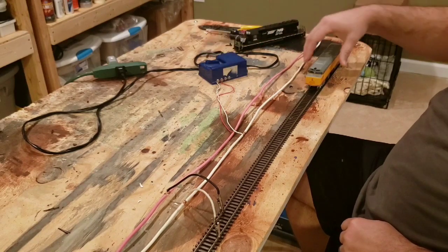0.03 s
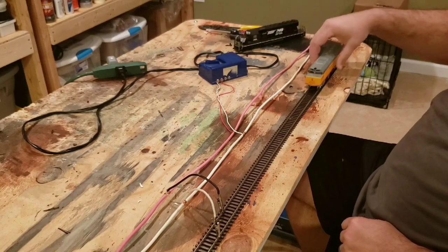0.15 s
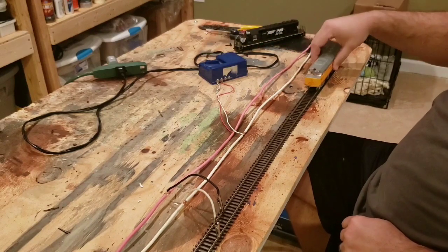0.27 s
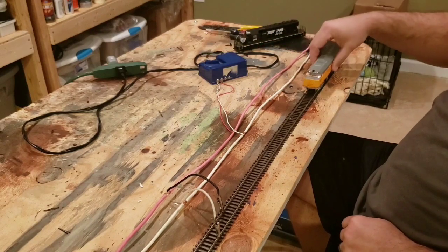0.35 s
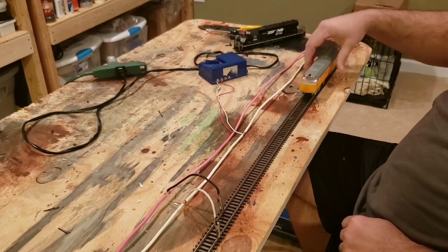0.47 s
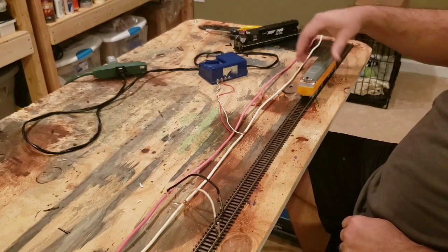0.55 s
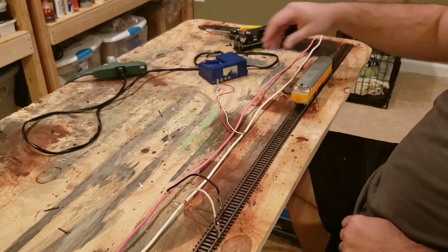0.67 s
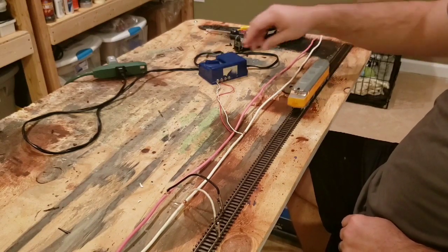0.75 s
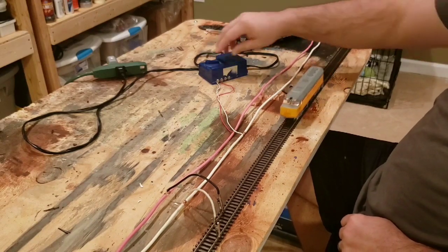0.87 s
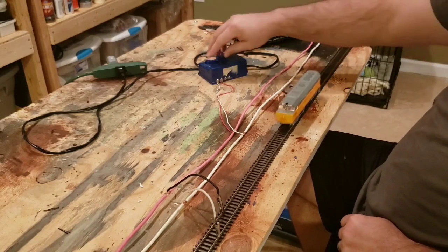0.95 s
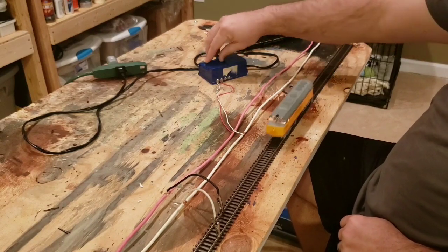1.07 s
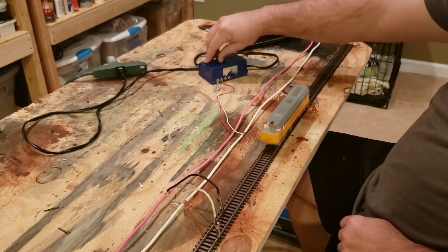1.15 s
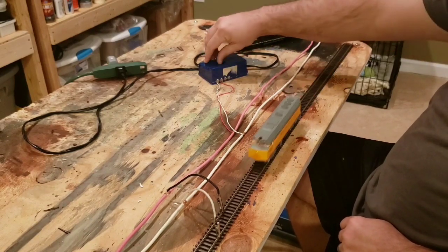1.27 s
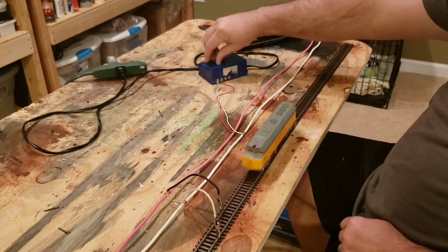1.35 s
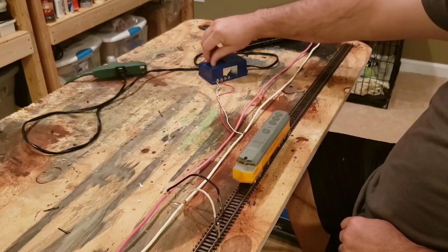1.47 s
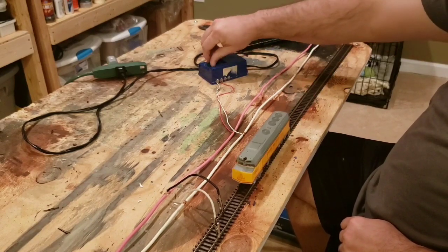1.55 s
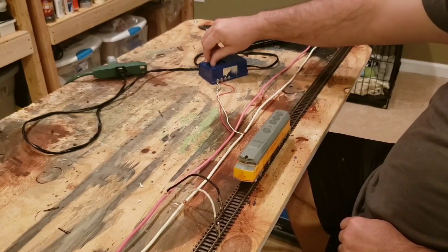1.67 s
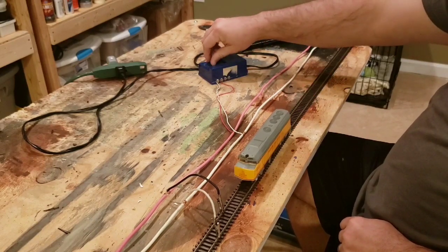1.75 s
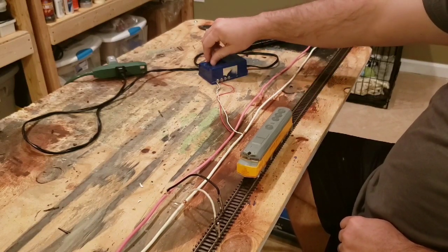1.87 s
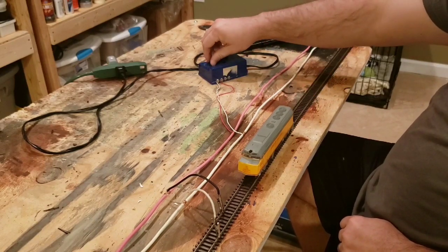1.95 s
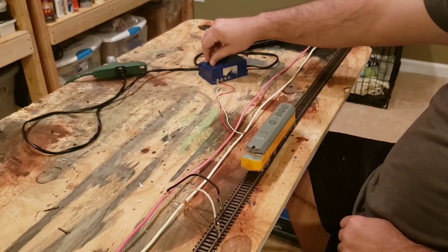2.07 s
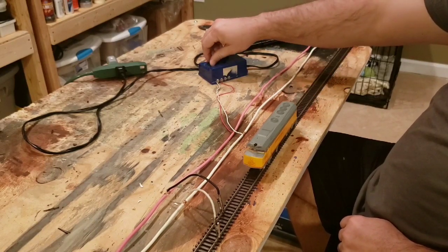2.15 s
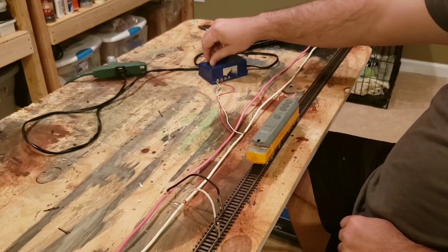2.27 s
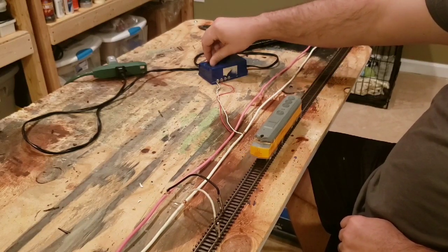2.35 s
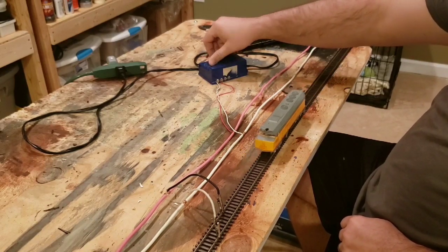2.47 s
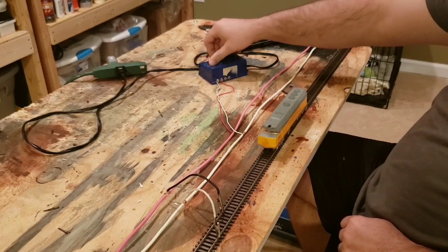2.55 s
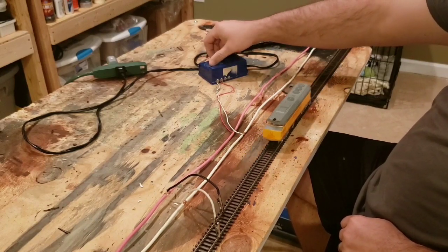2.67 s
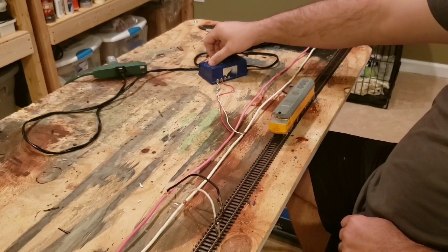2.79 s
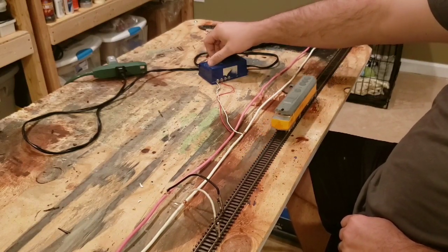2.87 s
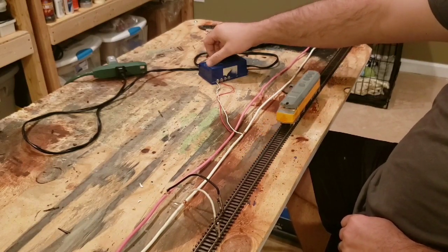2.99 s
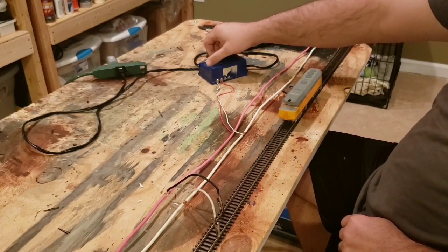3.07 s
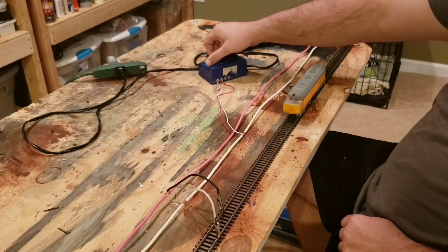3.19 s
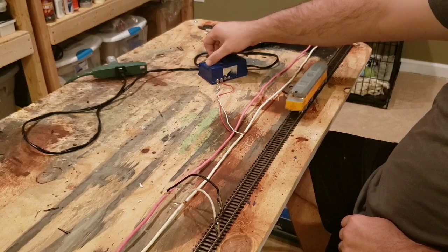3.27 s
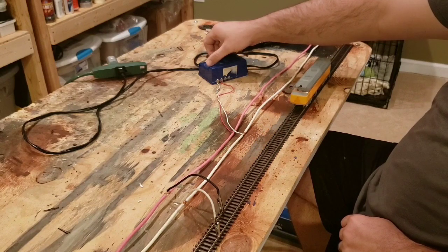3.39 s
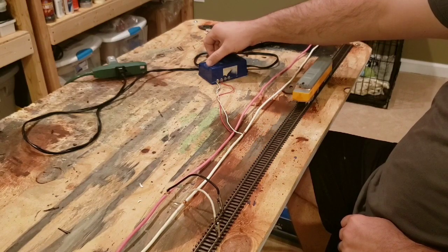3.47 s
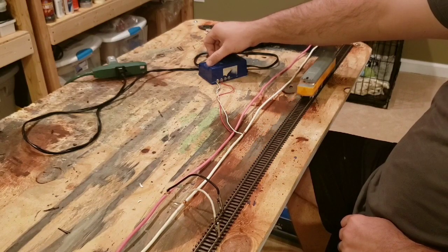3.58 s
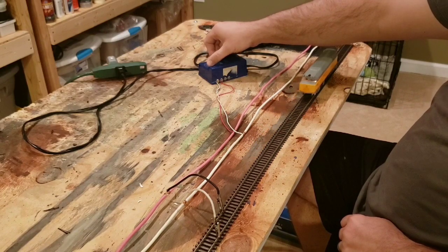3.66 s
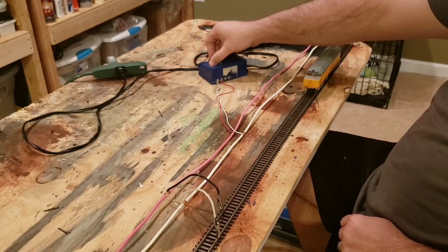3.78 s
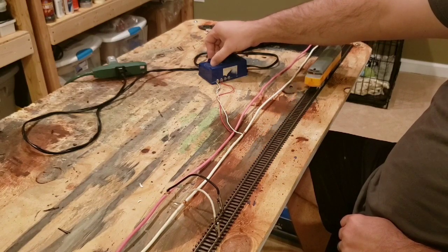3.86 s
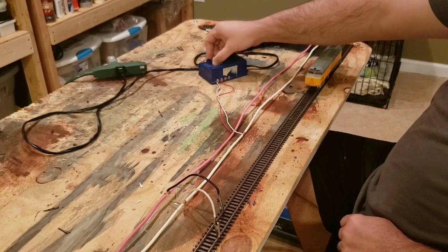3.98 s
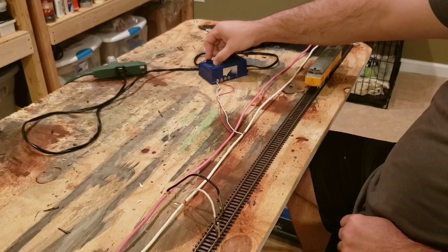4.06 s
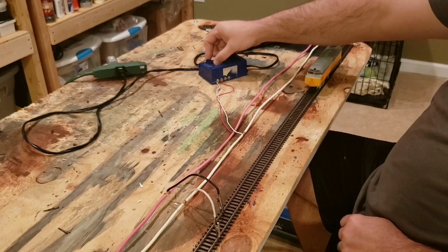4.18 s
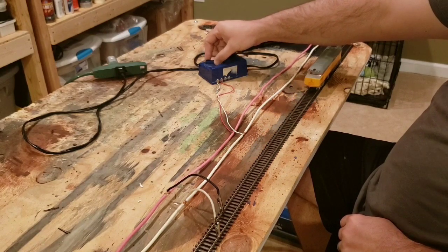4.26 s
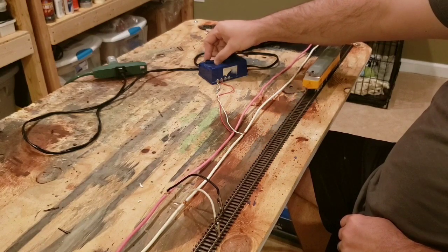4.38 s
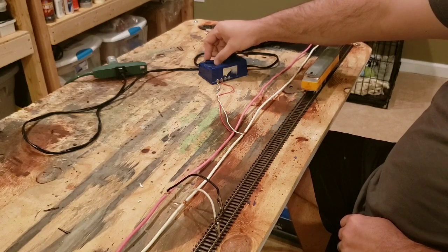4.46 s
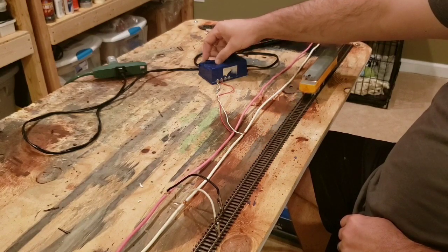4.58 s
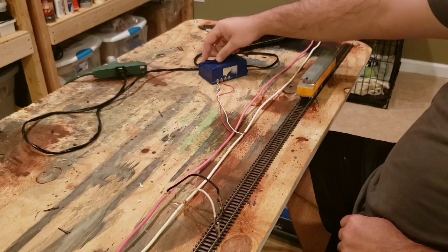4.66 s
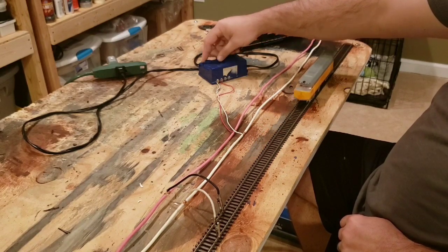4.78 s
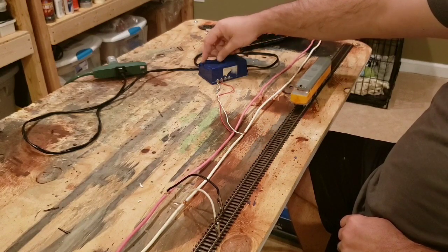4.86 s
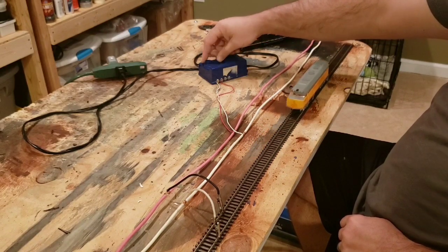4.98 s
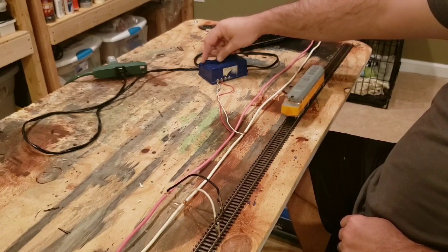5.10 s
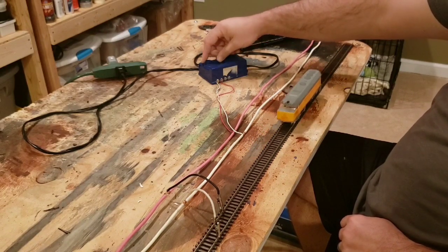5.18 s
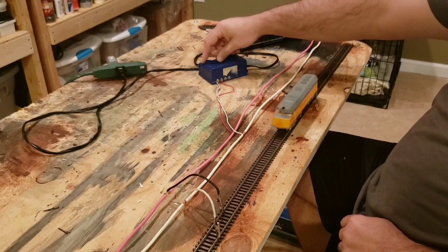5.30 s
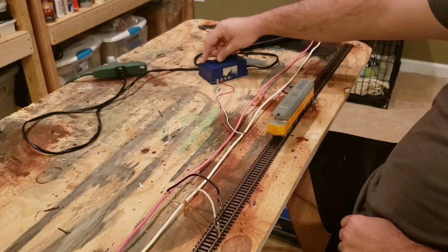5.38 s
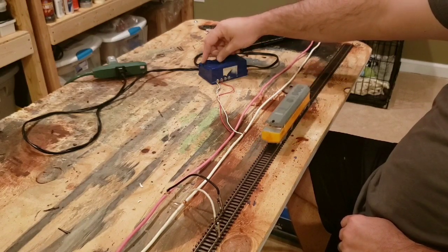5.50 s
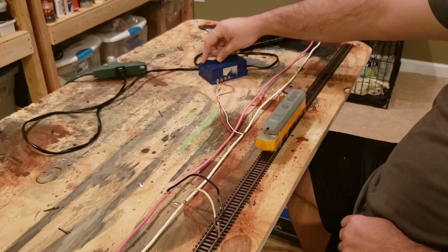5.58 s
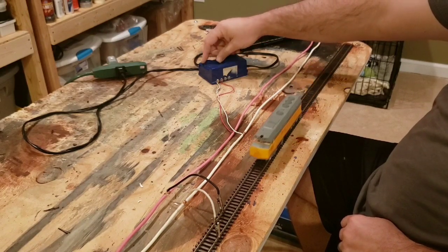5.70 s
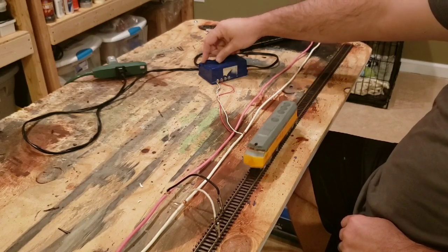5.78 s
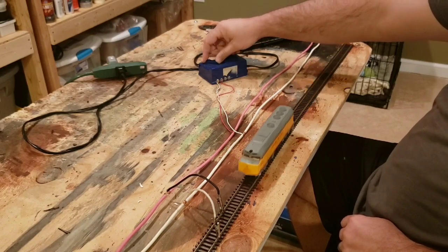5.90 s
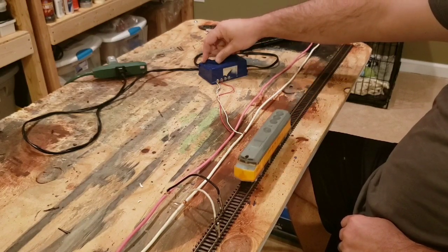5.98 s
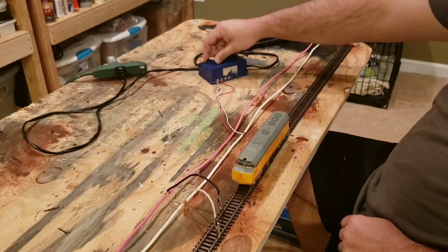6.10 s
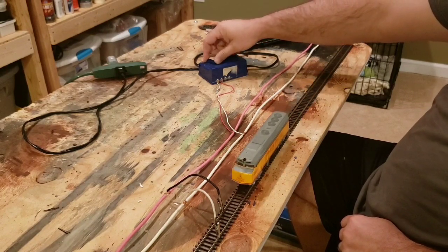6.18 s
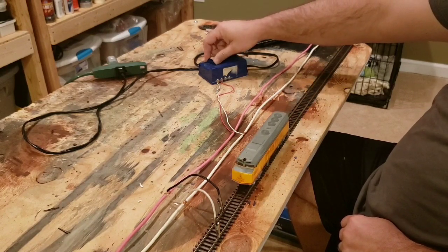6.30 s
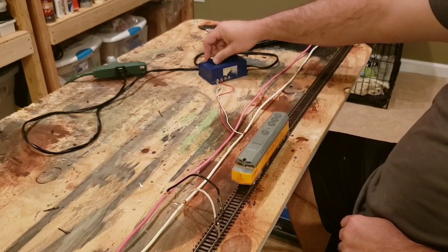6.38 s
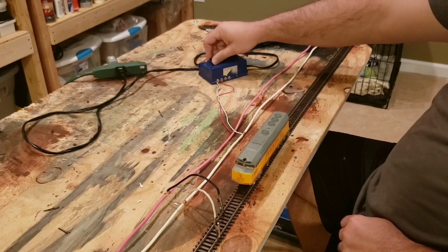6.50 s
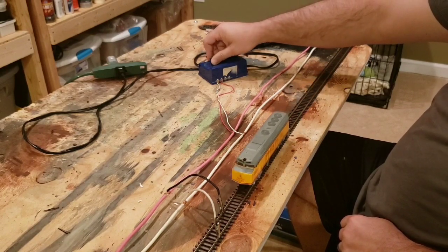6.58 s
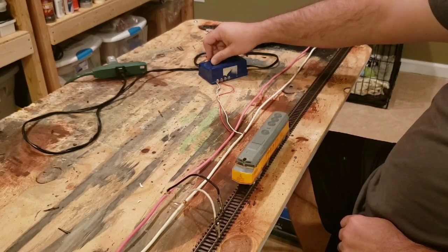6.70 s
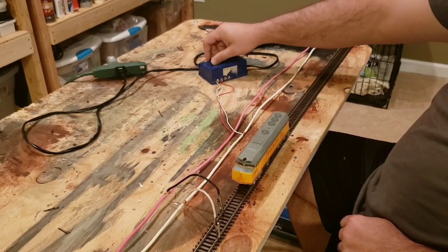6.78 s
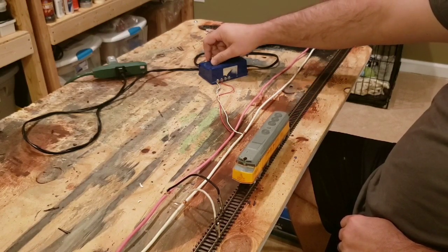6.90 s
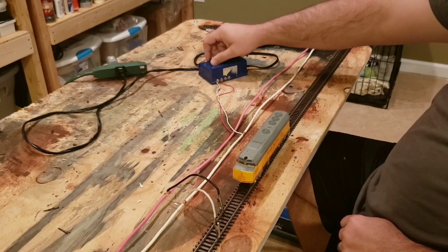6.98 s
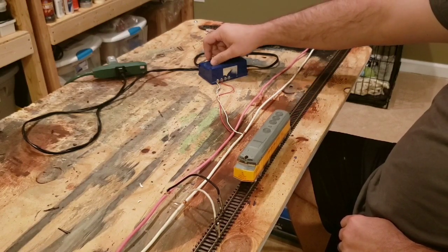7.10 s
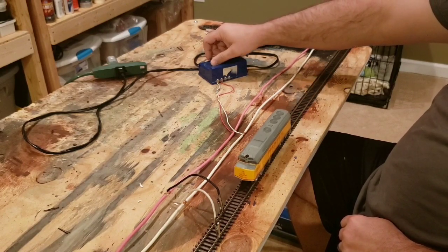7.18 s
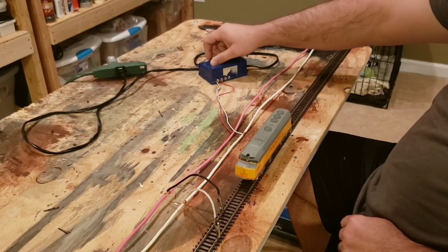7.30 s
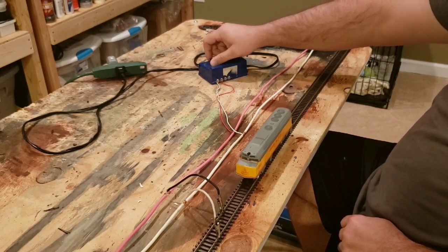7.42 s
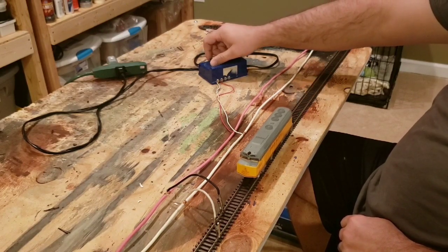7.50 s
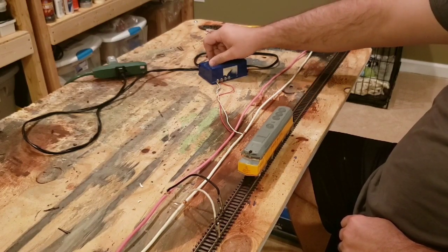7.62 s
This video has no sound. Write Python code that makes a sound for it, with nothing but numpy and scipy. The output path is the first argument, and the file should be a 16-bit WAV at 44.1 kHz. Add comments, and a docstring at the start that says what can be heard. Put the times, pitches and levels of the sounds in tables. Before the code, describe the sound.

Close stereo sound of a toy-sized electric train on a plywood bench indoors. Grinding plastic gears, rolling wheel rumble and thin metallic rail hiss rise and fall through a fast forward run, a rougher reverse run full of clacks and a gentler forward run. Each ends in a slowdown. Finally the gears stick, tick and scrape softly over a wavering low electrical hum.

```python
"""Model diesel locomotive on a plywood bench

It runs forward, backs up and runs forward again. Its gears grind and bind on every axle turn, its wheels
rumble into the board and hiss on the rails: dense tiny random impacts, sent through filters. Knocks are noise
bursts. At the end it barely creeps, scraping and ticking, over the hum (sine waves) and faint hiss of the room.
"""
import sys
import numpy as np
from scipy import signal
from scipy.fft import rfft, irfft
from scipy.io import wavfile

SR = 44100
rng = np.random.default_rng(int(sys.argv[2]) if len(sys.argv) > 2 else 0)


def store_pcm(level_fs):
    """Save levels as 16-bit WAV."""
    pcm = np.round(np.clip(level_fs, -1, 1) * 32767).astype(np.int16)
    wavfile.write(sys.argv[1], SR, np.atleast_2d(pcm).T)


N = 337365
TIME = np.arange(N) / SR  # seconds
TAPS = 2 ** 13  # length of the colouring filters in samples
FREQ = np.maximum(np.arange(TAPS // 2 + 1) * SR / TAPS, 1)  # Hz


def from_db(db):
    """Turn decibels into gain."""
    return 10 ** (np.asarray(db) / 20)


def rms_one(x):
    """Scale to unit power."""
    return x / np.sqrt(np.mean(x ** 2) + 1e-20)


def in_time(rows):
    """Draw each column of a curve sample by sample."""
    s, *columns = np.transpose(rows)
    return [np.interp(TIME, s, c) for c in columns]


def at_hz(points):
    """Read a spectrum's dB on the frequency grid, straight between points on a log-frequency axis."""
    hz, db = np.transpose(points)
    return np.interp(np.log(FREQ), np.log(hz), db)


def colour(x, db):
    """Filter with the given dB response, acting as promptly as possible (minimum phase)."""
    cepstrum = irfft(np.log(from_db(db)))
    # folding the cepstrum forward makes the filter causal
    cepstrum[1:TAPS // 2] *= 2
    cepstrum[TAPS // 2 + 1:] = 0
    impulse = irfft(np.exp(rfft(cepstrum)))
    return signal.oaconvolve(x, impulse)[:N]


def stereo_colour(pair, spectrum):
    """Give both channels the same spectrum."""
    return np.array([colour(side, at_hz(spectrum)) for side in pair])


def resonate(x, hz, width_hz):
    """Two-pole resonance with gain 1 at its top."""
    r = np.exp(-np.pi * width_hz / SR)
    feedback = [1, -2 * r * np.cos(2 * np.pi * hz / SR), r * r]
    return signal.lfilter(np.array([1, 0, -1]) * (1 - r * r) / 2, feedback, x)


def ringing(x, hz, width_hz):
    """Contacts heard through one steep-sided resonance, at unit power."""
    once = resonate(x, hz, 0.87 * width_hz)
    return rms_one(resonate(once, hz, 0.83 * width_hz))


def mode(x, hz, width_hz):
    """One resonance that keeps the power of white noise whatever its width."""
    return resonate(x, hz, width_hz) * np.sqrt(SR / (np.pi * width_hz))


def drift(rate_hz):
    """Slow random wandering with spread 1, worked out every 50 samples."""
    r = np.exp(-2 * np.pi * rate_hz * 50 / SR)
    slow = signal.lfilter([1], [1, -2 * r, r * r], rng.standard_normal(N // 50 + 1002))
    slow = slow[1000:]  # skip the filter's settling
    return np.interp(np.arange(N) / 50, np.arange(len(slow)), rms_one(slow))


def swell(s, length_s):
    """A bell-shaped rise and fall around a moment."""
    return np.exp(-((TIME - s) / length_s) ** 2 / 2)


def grains(per_s, spread_db):
    """Tiny impacts at random moments, of uneven size and either sign, at unit power overall."""
    unevenness = from_db(spread_db * np.minimum(rng.exponential(1, N), 5))
    sizes = unevenness * rng.standard_normal(N)
    return rms_one(sizes * (rng.random(N) < per_s / SR))


def blows(rows, decay_s):
    """Each blow is a brief, dying burst of noise: chatter between two hard parts."""
    out = np.zeros(N)
    for s, db in rows:
        start = int(s * SR)
        age = TIME[:min(SR // 20, N - start)]
        out[start:][:len(age)] += from_db(db) * np.exp(-age / decay_s) * rng.standard_normal(len(age))
    return out


def room(x, wet_db, t60, lag_s, apart_hz=480):
    """Direct sound reaches the right side first; a diffuse tail follows its power, alike on both sides in the bass."""
    keep = from_db(-120 / (t60 * SR))  # power falls 60 dB in t60 seconds
    tail = np.sqrt(signal.lfilter([1 - keep], [1, -keep], x * x + 1e-18))
    mid, side = rng.standard_normal((2, N))
    side = signal.lfilter(*signal.butter(1, apart_hz, "high", fs=SR), side)
    wet = tail * (mid + side * [[1], [-1]]) / np.sqrt(2)
    direct = np.array([np.roll(x, round(lag_s * SR)), x])
    return (direct + from_db(wet_db) * wet) / np.hypot(1, from_db(wet_db))


def shifting_modes(pair, depth_db, width_hz, rate_hz, size=1024):
    """As the contacts move, the body's many close modes swell and fade, each on its own, a little differently per ear."""
    window = dict(nperseg=size, noverlap=size * 3 // 4)
    spectra = signal.stft(pair, **window)[2]
    chance = rng.standard_normal((3, *spectra.shape[1:]))
    # smooth the chance across frequency, then across time
    for axis, step in ((1, SR / size / width_hz), (2, rate_hz * size / 4 / SR)):
        r = np.exp(-np.pi * step)
        chance = signal.lfilter([1], [1, -2 * r, r * r], chance, axis=axis)
    shared, own = chance[2], chance[:2]
    gain = rms_one(from_db(depth_db * rms_one(shared + 0.63 * own)))
    return signal.istft(spectra * gain, **window)[1][:, :N]


def background():
    """A wavering drone and faint hiss: nearly one sound in the bass, spread left and right in the treble."""
    # The quiet room's spectrum. Each row: frequency in Hz, relative level in dB.
    air_spectrum = [(15, 0.5), (29, -8), (37, -1), (47, -6), (75, 8), (120, 2.5), (190, -4.5), (250, -6),
                    (340, -19), (600, -31.5), (1200, -35), (1750, -26), (2700, -40.5), (5000, -43),
                    (8000, -49.5), (10000, -46), (12500, -39), (16000, -41)]
    # A faint airy ring: frequency in Hz, width in Hz, level in dB.
    air_ring = (1950, 380, -80)
    # The low drone before it wavers. Each row: time in seconds, level in dB.
    drone_curve = [(0.0, -48.5), (0.9, -51.5), (2.0, -52.5), (3.2, -55), (4.8, -47.5), (5.6, -50),
                   (7.6, -49)]
    # Brief swells of the drone. Each row: time in seconds, level of the swell in dB.
    drone_swells = [(0.42, -44.5), (1.19, -48), (1.408, -45), (1.86, -44), (6.11, -37), (6.76, -45.5),
                    (7.02, -44), (7.51, -46)]
    drone_hz, swell_s, air_db = 73.86, 0.018, -55

    drone_db, = in_time(drone_curve)
    swells = sum(from_db(db) * swell(s, swell_s) for s, db in drone_swells)
    drone_level = from_db(drone_db + 3.6 * drift(5.5)) + swells
    drone = drone_level * np.sin(2 * np.pi * drone_hz * TIME + 1.3 * drift(3.75))
    mid, side = rng.standard_normal((2, N))
    # how much left and right differ: Hz, dB
    apart_db = at_hz([(25, -5.5), (74, -14.5), (140, -12.5), (300, -7.5), (700, 0.0), (3000, 0.5)])
    noise = mid + colour(side, apart_db) * [[1], [-1]]
    hz, width, db = air_ring
    ring = from_db(db) * ringing(noise, hz, width)
    air = from_db(air_db) * rms_one(stereo_colour(noise, air_spectrum))
    return (air + ring + drone) * from_db([[.35], [-.35]])  # a touch louder on the left


def drive():
    """Speed (axle turns per second), direction and axle angle (radians) of whichever run is under way."""
    # Speed on the fast first run. Each row: time in seconds, speed in axle turns per second.
    first_run = [(0.332, 0.0), (0.429, 9.04), (0.736, 14.85), (0.909, 19.89), (1.193, 21.77), (1.363, 20.7),
                 (1.448, 12.86), (1.548, 12.0), (1.64, 5.2), (1.74, 0.0)]
    # Speed while backing up. Each row: time in seconds, speed in axle turns per second.
    back_run = [(1.652, 0.0), (1.79, 3.84), (1.931, 3.57), (2.4, 10.26), (2.595, 10.44), (2.811, 11.73),
                (3.25, 10.65), (3.787, 11.52), (4.019, 4.25), (4.1, 2.0), (4.16, 0.9), (4.25, 0.0)]
    # Speed on the gentler last run. Each row: time in seconds, speed in axle turns per second.
    last_run = [(4.214, 0.0), (4.26, 0.6), (4.35, 0.8), (4.358, 1.7), (4.4, 2.0), (4.45, 4.4),
                (4.575, 8.24), (4.997, 12.8), (5.249, 13.95), (5.55, 15.04), (5.798, 16.34), (6.008, 8.04),
                (6.185, 5.3), (6.245, 1.8), (6.3, 0.8), (6.36, 0.0)]
    # each run: speed curve, direction, axle angle at the start in turns
    runs = [(first_run, 1, .91), (back_run, -1, .89), (last_run, 1, .31)]

    speeds = np.array([in_time(curve)[0] for curve, _, _ in runs])
    direction, start_turns = np.transpose([run[1:] for run in runs])
    turns = start_turns[:, None] + np.cumsum(speeds, axis=1) / SR
    now = speeds.argmax(axis=0)  # the fastest curve is the run under way
    return speeds.max(axis=0), direction[now], 2 * np.pi * turns[now, np.arange(N)]


def mains():
    """Wavering mains hum made of three sines, stronger while the motor draws current."""
    # Frequencies of the hum in Hz.
    hum_hz = (120, 240, 300)
    # The hum before it wavers, one row per frequency. Each row: rms level at rest in dB, rms level added
    # under full load in dB.
    hum_levels = [(-63, -64.5), (-72.5, -72), (-84.5, -68)]

    speed, _, _ = drive()
    current = np.tanh(speed / 11)  # 0 at rest, towards 1 at speed
    out = 0
    for hz, (rest_db, load_db) in zip(hum_hz, hum_levels):
        level = (from_db(rest_db) + current * from_db(load_db)) * from_db(3.2 * drift(4.0))
        out = out + np.sqrt(2) * level * np.sin(2 * np.pi * hz * TIME + 0.5 * drift(5.1))
    return out


def creeping():
    """With too little current to run, the gears stick, scrape and tick, ringing the modes of their housing."""
    # Gear teeth taking up their slack. Each row: time in seconds, strength of the blow in dB.
    tick_rows = [(0.3044, -60), (6.4093, -57), (6.995, -60), (7.034, -56), (7.1571, -53), (7.258, -54),
                 (7.3193, -48), (7.3481, -45), (7.4168, -48), (7.5305, -42), (7.6241, -48), (7.6424, -53)]
    # Gears scraping. Each row: middle in seconds, half-length in seconds, strength of the rubbing in dB.
    scrape_rows = [(1.685, 0.028, -60), (6.415, 0.021, -73), (6.64, 0.057, -69.5), (7.023, 0.024, -70),
                   (7.22, 0.066, -69), (7.338, 0.011, -65), (7.415, 0.07, -61.5), (7.6, 0.082, -68)]
    # Modes of the gear housing, lightly touched. Each row: frequency in Hz, width in Hz, relative level in dB.
    housing = [(750, 270, -14), (1490, 680, 3), (2070, 150, -18), (2780, 220, -12), (3630, 230, -8.5),
               (4100, 450, -3), (5030, 640, -6), (5960, 500, -11), (6360, 540, -11.5), (7830, 410, -6),
               (13000, 4700, -4)]

    rubbing = sum(from_db(db) * swell(s, length) for s, length, db in scrape_rows)
    scrape = room(rubbing * grains(per_s=780, spread_db=2.0), wet_db=9.0, t60=0.19, lag_s=.00002)
    ticks = room(blows(tick_rows, decay_s=0.0013), wet_db=-1.0, t60=0.13, lag_s=.00002)
    scrape = shifting_modes(scrape, depth_db=3.5, width_hz=250, rate_hz=20)
    touched = sum(from_db(db) * mode(scrape + ticks, hz, width) for hz, width, db in housing)
    return from_db(-10.0) * touched


def running_levels(speed, backwards, place):
    """Rumble, rasp and hiss in dB: speed, direction and place set them, and they shift while the train judders."""
    # Rows for wheel rumble, gear rasp and rail hiss. Each row: level at cruising speed in dB, dB per doubling
    # of speed, dB added in reverse, dB added at the near end.
    running = [(-56, 7.5, 1.0, 3.5), (-48.5, 8, -0.5, 0.5), (-48, 11, 0.5, -3)]
    # The train judders or briefly sticks at full speed, on braking or on getting going. Each row: start in
    # seconds, length in seconds, dB added to the rumble, dB added to the rasp, dB added to the hiss.
    judders = [(1.233, 0.13, 0.5, 1.4, 1), (1.506, 0.078, 5, 5, 7.5), (1.766, 0.021, -0.5, 5, 0),
               (1.86, 0.015, -6, 0.5, -1), (1.93, 0.033, -2.5, -1, 1), (1.977, 0.038, 0, 1, 2),
               (2.067, 0.02, 0, 2.6, 2), (2.13, 0.02, -2.5, -2, -2), (2.173, 0.02, 4, 2, 1),
               (2.205, 0.0059, -1, 1.5, 1), (2.227, 0.024, 1.5, 2, 1), (2.288, 0.014, 1, 1.5, 1.9),
               (3.68, 0.21, 0, -1.5, 0), (3.961, 0.018, 2.5, 0.5, 6.5), (4.424, 0.042, -2, -0.8, 1),
               (5.967, 0.016, 2.5, 0.8, 3), (6.084, 0.24, 3.5, 0.57, 3)]
    cruise_turns_per_s, attack_s, release_s = 10, 0.0068, 0.032

    doublings = np.log2(speed / cruise_turns_per_s + 1e-4)
    levels = np.array([db + slope * doublings + reverse * backwards + near * place
                       for db, slope, reverse, near in running])
    for s, length, *added_db in judders:
        corners = [s - attack_s, s, s + length, s + length + release_s]
        levels = levels + np.outer(added_db, np.interp(TIME, corners, [0, 1, 1, 0]))
    return levels


def binding(speed, angle, backwards, forward_db, reverse_db, teeth_db):
    """Swing of the gear load in dB: a tight spot once a turn, twice a turn in reverse, where it is worst at a crawl."""
    crawl = .2 + 1 / (1 + (speed / 9.5) ** 8)
    pace = np.exp(-((speed - 15) / 6) ** 2)  # forward, it is worst near 15 turns per second
    tight = np.where(backwards, reverse_db * crawl * np.cos(2 * angle), forward_db * pace * np.cos(angle))
    teeth = np.cos(7 * angle) + .7 * np.cos(9 * angle)
    return tight + teeth_db * teeth


def bench_echoes(x, place, first_s, sweep_s, echo_db, count=6):
    """Near reflections arrive later the farther off the train is, so their comb glides as it travels."""
    lags = [first_s * np.sqrt(k) * k + sweep_s * np.sqrt(k) * (1 - place) for k in range(1, count + 1)]
    return x + from_db(echo_db) * sum(np.interp(TIME - lag, TIME, x) for lag in lags)


def wander(pair, share, rate_hz):
    """A steady ringing slides about in pitch by a share of itself, as if played a bit faster or slower."""
    at = np.arange(N) + np.cumsum(share * drift(rate_hz))
    return rms_one(np.array([np.interp(at % N, np.arange(N), side) for side in pair]))


def wheel_rumble(rolling, sliding, place):
    """Wheel contacts as board and chassis radiate them; the bench top booms at its far end."""
    # Spectrum of the wheel noise. Each row: frequency in Hz, relative level in dB.
    board_spectrum = [(80, -15.5), (140, 14), (200, -5), (300, 7), (380, -0.5), (500, 1.5), (620, -1),
                      (760, 3), (950, -1.5), (1360, 1.5), (1510, 5), (1740, 3.5), (1850, -1.5),
                      (2600, -4.5), (5000, -47.5)]
    # The boom: frequency in Hz, width in Hz, level at the far end against the rumble in dB.
    far_boom = (634, 550, -4.5)

    hz, width, db = far_boom
    boom = from_db(db) * np.exp(-(place / 0.31) ** 2) * ringing(sliding, hz, width)
    return from_db(-0.75) * rms_one(stereo_colour(rolling, board_spectrum)) + boom


def gear_rasp(rolling, meshing, slowness):
    """Tooth contacts as the plastic shell radiates them; some of its modes stand out when the gears turn slowly."""
    # Spectrum of the gear noise. Each row: frequency in Hz, relative level in dB.
    shell_spectrum = [(1000, -16), (2100, -8.5), (2700, -1.5), (3300, -1), (3900, 1.5), (4600, -1.5),
                      (5300, -0.5), (6100, 1), (6900, -3.5), (7600, -2), (8350, 1.5), (9100, -6),
                      (10500, -10), (14000, -44)]
    # The modes that stand out. Each row: frequency in Hz, width in Hz, level against the rasp in dB
    # before it drifts.
    slow_rings = [(1535, 140, -13), (4100, 2500, -6), (5250, 600, -15), (7960, 640, -11)]

    rings = 0
    for hz, width, db in slow_rings:
        contacts = rolling if hz > 2000 else meshing
        ring = wander(ringing(contacts, hz, width), share=0.018, rate_hz=4)
        rings = rings + from_db(db + 4.4 * drift(2.0)) * ring
    rasp = rms_one(stereo_colour(meshing, shell_spectrum))
    return from_db(-2 * slowness) * rasp + slowness * rings


def rail_hiss(sliding):
    """Metal wheels and pickups sliding on the rails, at unit power."""
    # Spectrum of the sliding. Each row: frequency in Hz, relative level in dB.
    rail_spectrum = [(6000, -58), (8900, 1), (10000, 0.5), (11000, 3.5), (12200, 8.5), (13300, 3.5),
                     (14600, 8), (15600, 4), (16000, -2)]
    return rms_one(stereo_colour(sliding, rail_spectrum))


def growling(sliding):
    """Straining gears set one resonance of the body growling at a time or a few together."""
    # Each row: middle in seconds, half-length in seconds, frequency in Hz, width in Hz, level in dB.
    growl_rows = [(0.47, 0.045, 5000, 600, -52), (1.252, 0.091, 3240, 500, -49),
                  (1.554, 0.037, 1350, 850, -44.5), (1.875, 0.0056, 1520, 280, -55.5),
                  (2.33, 0.13, 8240, 546, -69), (2.603, 0.019, 4180, 280, -52),
                  (3.003, 0.066, 4220, 400, -54), (2.365, 0.11, 2700, 600, -59),
                  (3.25, 0.45, 1554, 170, -63.5), (3.4, 0.3, 1700, 100, -69), (4.367, 0.02, 5270, 400, -72),
                  (4.47, 0.035, 1590, 250, -68), (4.58, 0.072, 760, 190, -62),
                  (6.064, 0.098, 8340, 600, -57), (6.595, 0.025, 8100, 900, -81),
                  (6.659, 0.03, 1920, 1700, -66), (6.67, 0.048, 2750, 1100, -77),
                  (6.665, 0.032, 3900, 400, -79), (7.17, 0.12, 6400, 700, -80.5)]
    return sum(from_db(db) * swell(s, length) * ringing(sliding, hz, width)
               for s, length, hz, width, db in growl_rows)


def knocking():
    """Each knock is a bright crack of metal and a thud of the chassis; a thin metal strip in it snaps and pings."""
    # Hard knocks of wheels and gears. Each row: time in seconds, strength of the crack in dB, strength of
    # the thud in dB, both before room and resonance.
    knock_rows = [(0.343, -56, -77), (0.676, -27, -41), (0.796, -40, -58), (1.1323, -25, -44),
                  (1.179, -21, -44), (1.5026, -27, -49), (1.8452, -52, -70), (2.013, -46, -47),
                  (2.355, -41, -39.5), (2.3947, -33, -47), (2.491, -30, -42.5), (2.526, -45, -54),
                  (2.604, -33, -45), (2.663, -25.5, -39.5), (2.868, -29, -46), (2.948, -28, -45),
                  (3.160, -32, -42), (3.2163, -40, -55), (3.27, -23, -46), (3.3616, -22.5, -56),
                  (3.497, -27.5, -57), (3.7348, -21.5, -39), (3.747, -39, -50), (5.4907, -28, -49),
                  (5.78, -39, -38.5), (6.143, -38, -63)]
    # Colour of the crack. Each row: frequency in Hz, gain in dB.
    crack_spectrum = [(200, 4.5), (700, -13), (1600, -18), (2400, -33), (4500, 0), (7000, -5),
                      (12000, -3.5), (16000, 2)]
    # The chassis mode that thuds: frequency in Hz, width in Hz.
    thud_mode = (1640, 250)
    # Snaps of the metal strip. Each row: time in seconds, strength in dB before room and resonance.
    ping_rows = [(0.344, -53), (1.846, -43), (1.975, -45), (2.165, -40), (2.246, -42), (2.292, -36),
                 (2.341, -31), (2.447, -38), (7.3193, -55), (7.333, -55), (7.5305, -58), (7.6241, -54),
                 (7.6424, -48)]
    # The strip's mode: frequency in Hz, width in Hz.
    ping_mode = (8000, 440)

    crack_blows = blows([(s, db) for s, db, _ in knock_rows], decay_s=0.0019)
    thud_blows = blows([(s, db) for s, _, db in knock_rows], decay_s=0.0035)
    cracks = room(crack_blows, wet_db=1.5, t60=0.35, lag_s=.0001)
    thuds = room(thud_blows, wet_db=0.0, t60=0.13, lag_s=.0001)
    pings = room(blows(ping_rows, decay_s=0.00071), wet_db=-7.0, t60=0.1, lag_s=.0001)
    crack = from_db(0.5) * stereo_colour(cracks, crack_spectrum)
    return crack + mode(thuds, *thud_mode) + mode(pings, *ping_mode)


def locomotive():
    """Dense tiny contacts of teeth and wheels, throbbing with the gear load, sound through board, shell and rails."""
    # Right ear over left for the train. Each row: frequency in Hz, difference in dB.
    right_bias = [(200, -1), (700, 1.5), (1300, -1.5), (2400, 0), (4400, 6), (8100, 6), (15000, 0.5)]

    speed, direction, angle = drive()
    backwards = direction < 0
    travel = np.cumsum(direction * speed)
    place = travel / travel.max()  # 0 at the far end, 1 nearest
    rumble_db, rasp_db, hiss_db = running_levels(speed, backwards, place)
    slowness = 1 / (1 + (speed / 11) ** 4)
    load_db = binding(speed, angle, backwards, forward_db=1.6, reverse_db=2.5, teeth_db=.8)
    load_db = load_db + 0.9 * drift(110)  # the teeth chatter
    chatter_db = 1.3 * drift(75)  # wheels skitter on the rails

    def heard(contacts):
        """Contacts by way of bench and room, in stereo."""
        near = bench_echoes(contacts, place, first_s=.0017, sweep_s=.0008, echo_db=-5.5)
        return room(near, wet_db=5.5, t60=0.18, lag_s=.0001)

    rolling = heard(grains(per_s=2200, spread_db=1.5))
    meshing = heard(grains(per_s=3000, spread_db=1.5))
    sliding = heard(grains(per_s=3600, spread_db=3.0))
    wheels = from_db(rumble_db + 0.72 * load_db) * wheel_rumble(rolling, sliding, place)
    gears = from_db(rasp_db + load_db) * gear_rasp(rolling, meshing, slowness)
    rails = from_db(hiss_db + load_db + chatter_db) * rail_hiss(sliding)
    board = shifting_modes(wheels, depth_db=2.0, width_hz=45, rate_hz=8, size=2048)
    shell = shifting_modes(gears + rails, depth_db=2.4, width_hz=110, rate_hz=12)
    left, right = board + shell + growling(sliding) + knocking()
    bias_db = at_hz(right_bias) / 2  # half taken from the left, half given to the right
    return np.array([colour(left, -bias_db), colour(right, bias_db)])


def scene():
    """The room, and the train creeping and running."""
    return background() + mains() + creeping() + locomotive()


def record(dry):
    """A steep low-pass filter cuts the top above 15900 Hz."""
    low_pass = signal.ellip(12, .1, 80, 15900, fs=SR, output="sos")
    return signal.sosfilt(low_pass, dry)


dry = scene()
out = record(dry)
store_pcm(out)
```